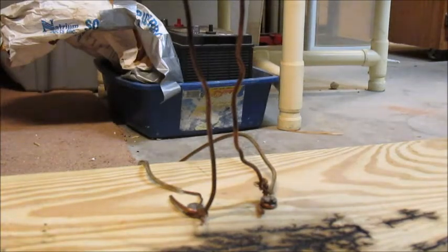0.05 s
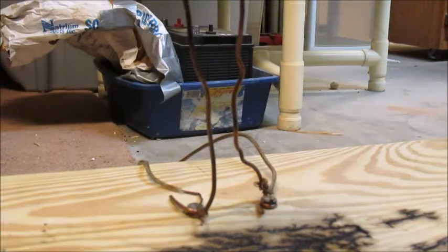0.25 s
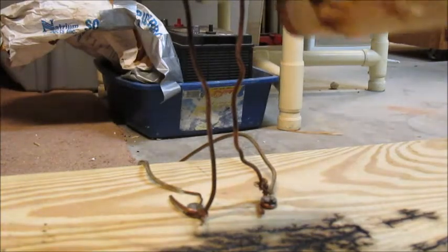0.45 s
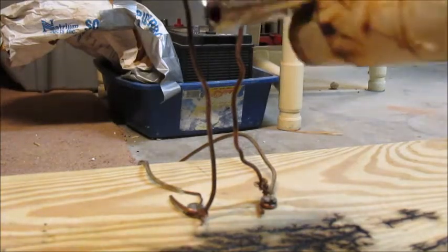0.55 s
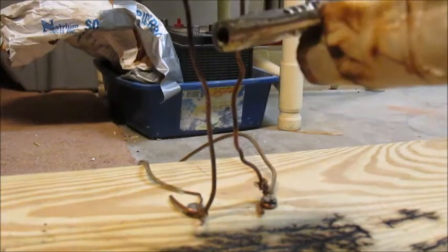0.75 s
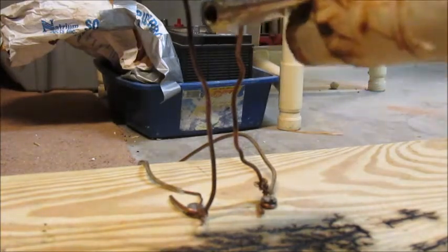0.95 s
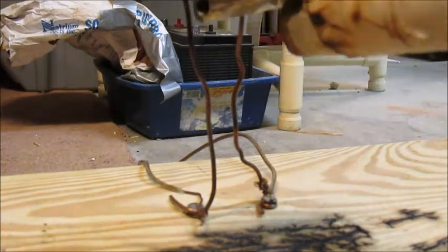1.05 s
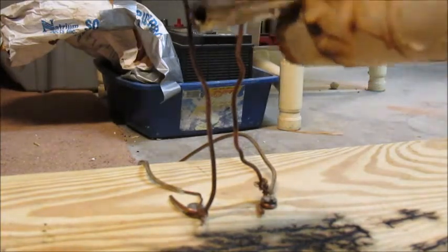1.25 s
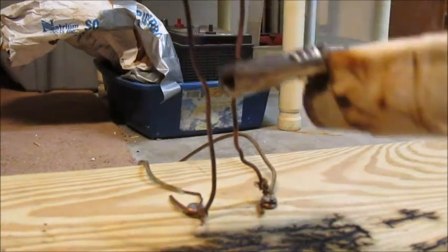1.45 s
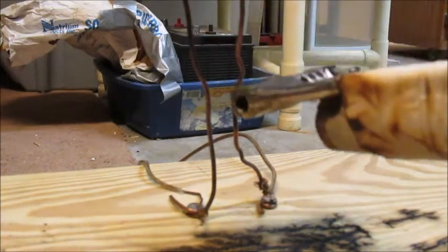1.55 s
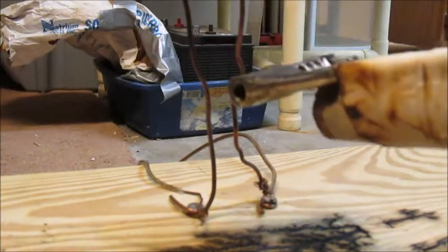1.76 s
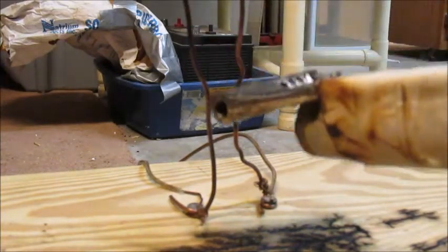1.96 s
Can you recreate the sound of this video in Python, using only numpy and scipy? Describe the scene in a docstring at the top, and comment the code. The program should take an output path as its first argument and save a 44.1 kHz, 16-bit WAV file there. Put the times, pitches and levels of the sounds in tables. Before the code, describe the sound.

An electric arc between two wires starts with a sharp crack, buzzes harshly and snaps off, then does it again. A thin sizzle precedes each burst, close to the microphone in a small room with a low hum.

```python
"""An arc climbing between two upright high-voltage wires on a workbench, close to a stereo microphone.
Corona sizzles in time with the mains until the gap breaks down with a crack. The arc then re-ignites on
every half cycle, stretches, deepens and snaps off; this happens twice. A few pops hit mainly the left
microphone. The room is small and hard, with a rush of air and the low hum of a fan or motor;
both dip with the recorder's gain after each loud arc."""
import sys
import numpy as np
from scipy import signal
from scipy.fft import rfft, irfft
from scipy.io import wavfile
from scipy.ndimage import uniform_filter1d

SR = 44100
rng = np.random.default_rng(int(sys.argv[2]) if len(sys.argv) > 2 else 0)


def waveform_to_disk(signal):
    """Save audio, clipped to [-1, 1], as 16-bit WAV at the path in sys.argv[1]."""
    frames = np.transpose(np.atleast_2d(signal))
    scaled = np.clip(frames, -1, 1) * 32767
    samples = np.round(scaled).astype(np.int16)
    wavfile.write(sys.argv[1], SR, samples)


N = 88200
MAINS_HZ = 60.0
HALF_CYCLE_S = .5 / MAINS_HZ
SPARK_SAMPLES = 512

# Breakdowns of the gap; stretch runs from a short arc (0) to a long one (1), pan is left over right
# [t/s, level/dB, sound travel along the channel/s, far end of the channel/dB, stretch, thud/dB, pan/dB]
BREAKDOWNS = [(0.2335, -16.5, 0.00061, -17.5, 0.23, -52.5, 3.5),
              (1.0698, -19.5, 0.0013, -7.5, 0.4, -45.5, 7)]
# Course of the arc up the wires, one list per climb [t/s, spark level/dB, stretch, thud/dB, pan/dB]
ARC_CLIMBS = [
    [(.243, -30, 0, -64.5, 3), (.29, -34.5, 0.17, -61.5, 0.5), (.33, -33, 0.22, -63, 2),
     (.434, -34, 0.15, -67, 4.5), (.452, -25, 0.05, -58, 1), (.478, -23.5, 0, -53.5, 3.5),
     (.54, -28.5, 0.2, -57.5, 2.5), (.585, -34, 0.94, -55, -1), (.602, -25.5, 0.58, -50, 0),
     (.622, -28.5, 0.67, -56, -0.5)],
    [(1.075, -42, 0, -80, -4.5), (1.10, -39, 0.3, -61.5, 3), (1.205, -41.5, 0.04, -73.5, -0.5),
     (1.28, -35, 0.42, -58.5, 1), (1.33, -33, 0.45, -61, -1), (1.382, -31.5, 0.69, -52, -0.5),
     (1.402, -29.5, 0.99, -54, -2.5), (1.413, -19, 0.8, -47, -2)],
]


def undb(db):
    return 10 ** (np.asarray(db) / 20)


def unit(x):
    return x / np.sqrt(np.mean(x ** 2))


def spectrum_db(points, size):
    """A curve [f/Hz, level/dB] on the bins of a transform."""
    hz, db = np.array(points, float).T
    return np.interp(np.log(np.fft.rfftfreq(size, 1 / SR) + 1), np.log(hz), db)


def colour(x, points):
    """Give a sound a spectrum."""
    return irfft(rfft(x) * undb(spectrum_db(points, N)), N)


def causal(db):
    """Response that starts at once and rings off, with the given gains."""
    cepstrum = irfft(db * np.log(10) / 20)
    cepstrum[1:len(cepstrum) // 2] *= 2
    cepstrum[len(cepstrum) // 2 + 1:] = 0
    return np.exp(rfft(cepstrum))


def wander(rate_hz):
    """Smooth random motion with a spread near 1."""
    hold = int(SR / rate_hz)
    steps = np.repeat(rng.standard_normal(N // hold + 1), hold)
    return unit(uniform_filter1d(uniform_filter1d(steps, hold), hold)[:N])


def add(out, t, sound, pan_db):
    """Mix a short sound in at its exact time and place."""
    start, fraction = divmod(max(t, 0) * SR, 1)
    start = int(start)
    shift = np.exp(-2j * np.pi * np.fft.rfftfreq(SPARK_SAMPLES) * fraction)
    sound = irfft(rfft(sound) * shift)[:, :N - start]
    out[:, start:start + SPARK_SAMPLES] += sound * undb(np.array([[pan_db], [-pan_db]]) / 2)


def corona(t):
    """Hiss flares on the wires at each voltage peak, more on one polarity; at first with a tick a cycle."""
    # Loudness of the corona [t/s, level/dB]
    levels = [(0, -54), (.15, -56), (.22, -56.5), (.72, -62.5), (.95, -59.5), (1.06, -57), (1.55, -63.5),
              (2, -63)]
    # Spectrum of its hiss [f/Hz, level/dB]
    spectrum = [(1470, -63.5), (2500, -30.5), (3600, -19.5), (5270, -13.5), (6920, -11), (9730, -3.5),
                (11500, -2), (15200, -6), (16000, -20.5)]
    peak_s, width_s, weak_half_db = .0115, .003, -5.5
    ticks_until_s, tick_lead_s = .15, .0015

    def flare(at):
        away = (t - at + HALF_CYCLE_S) % (1 / MAINS_HZ) - HALF_CYCLE_S
        return np.exp(-np.abs(away / width_s) ** 3)
    flares = flare(peak_s) + undb(weak_half_db) * flare(peak_s + HALF_CYCLE_S)
    noise = rng.standard_normal(N) + .98 * rng.standard_normal((2, N))
    flicker = np.exp(.29 * wander(1500))
    hiss = unit(colour(noise, [(600, -36.5)] + list(spectrum)) * flares * flicker)
    out = hiss * undb(np.interp(t, *np.array(levels).T))
    for strike, climb in zip(BREAKDOWNS, ARC_CLIMBS):
        out *= (t < strike[0]) | (t > climb[-1][0])  # it dies while an arc shorts the wires
    for peak in np.arange(peak_s, ticks_until_s, 1 / MAINS_HZ):
        at = peak - tick_lead_s * rng.random()
        tick = spark(np.zeros(1), np.ones(1), stretch=.17, db=-54 + 2 * rng.standard_normal())
        add(out, at, tick, pan_db=2)
    return out


def room_tone(t):
    """Wavering low hum of a fan or motor, with faint mains tones above it, over the rush of the room."""
    # Tones of the hum [f/Hz, level/dB before the recorder's gain, unsteadiness]
    hum = [(52.7, -71, 0.37), (116.3, -80.5, 0.72), (358, -85, .45), (600, -93.5, 0.27), (670, -97, .5)]
    # Spectrum of the rush [f/Hz, level/dB]
    rush = [(15, -54), (25, -1.5), (59, -4.5), (82, -9), (117, -3.5), (189, -10), (359, -18.5),
            (389, -17.5), (3000, -32), (3900, -52), (6600, -120)]
    # The recorder's gain on hum and rush dips after each loud arc and slowly recovers [t/s, level/dB]
    recorder_gain = [(0, 7), (.2, 7.5), (.68, 1), (1.0, 5), (1.5, 0), (2, 2)]
    air = rng.standard_normal(N) + rng.standard_normal(N) * np.array([[1], [-1]])
    out = undb(-70) * unit(colour(air, list(rush) + [(8000, -30.5)]))
    for hz, db, waver in hum:
        for side in out:
            amplitude = undb(db) * np.sqrt(2) * (1 + waver * wander(11))
            side += amplitude * np.sin(2 * np.pi * hz * t + waver * wander(3.3))
    return out * undb(np.interp(t, *np.array(recorder_gain).T))


def spark(delays, sizes, stretch, db):
    """Each bend of the channel sends a tiny shock to each microphone, deeper in a long arc."""
    # Spectrum of a spark in a short arc [f/Hz, level/dB]
    short_arc = [(300, -50), (1000, -33), (2000, -33.5), (3500, -24.5), (5000, -26.5), (7500, -18.5),
                 (9500, -9), (12300, 2), (14500, -2), (16500, -16.5)]
    # The same in a long arc [f/Hz, level/dB]
    long_arc = [(300, -53), (1000, -22.5), (2100, -24), (2700, -12.5), (3600, -5.5), (4900, -8.5),
                (6400, -4.5), (7600, -5), (9200, 0.5), (12000, -5.5), (16500, -19.5)]
    mic_lag_s, mic_imbalance = .000005, .22
    hz = np.fft.rfftfreq(SPARK_SAMPLES, 1 / SR)
    stretch = np.clip(stretch, 0, 1)
    shock = causal((1 - stretch) * spectrum_db(short_arc, SPARK_SAMPLES)
                   + stretch * spectrum_db(long_arc, SPARK_SAMPLES))
    lag, lean = rng.standard_normal((2, 1, len(delays))) * np.array([[1], [-1]])
    delays = delays + mic_lag_s * lag
    delays = delays - delays.min() + 4 / SR
    sizes = sizes * np.exp(mic_imbalance * lean)
    bends = sizes[..., None] * np.exp(-2j * np.pi * delays[..., None] * hz)
    return -undb(db) * unit(irfft(shock * bends.sum(axis=1)))


def thud(db, corner_hz=426):
    """The suddenly heated air gives one soft, low push."""
    age = 2 * np.pi * corner_hz * np.arange(SPARK_SAMPLES) / SR
    return -undb(db) * unit(np.exp(-age) * (1 - np.exp(-4 * age)))


def fresh_channel(bends=7):
    """Places (0-1) of the bends along a new channel."""
    place = (np.arange(bends) + rng.random(bends)) / bends
    return place - place[0]


def breakdowns():
    """The air in the gap gives way with one crack and a thud."""
    out = np.zeros((2, N))
    for at, db, path_s, far_db, stretch, thud_db, pan_db in BREAKDOWNS:
        place = fresh_channel()
        crack = spark(place * path_s, undb(far_db * place), stretch, db)
        add(out, at, crack + thud(thud_db), pan_db)
    return out


def climbing_arcs():
    """A spark each half cycle through a writhing channel, with small side discharges between."""
    ignition_s, jitter_s = .0021, .00008  # place of a spark in the half cycle, its scatter
    path_s, writhe_s, shake_s = .0008, .00002, .000006  # delays of the bends: span, drift, scatter
    far_end_db = [-3, -17.5]  # against the near end, in a short and a long arc
    spark_scatter_db, thud_scatter_db = 1.27, 2
    strays, stray_db, stray_scatter_db = 2, -18, 4.5
    out = np.zeros((2, N))
    ignitions = np.arange(ignition_s, N / SR, HALF_CYCLE_S)
    for climb in ARC_CLIMBS:
        times, *controls = np.array(climb).T
        place = fresh_channel()
        delays = place * path_s
        for at in ignitions[(ignitions >= times[0]) & (ignitions <= times[-1])]:
            db, stretch, thud_db, pan_db = (np.interp(at, times, column) for column in controls)
            drift, shake, flash = rng.standard_normal((3, len(place)))
            loud, push, late = rng.standard_normal(3)
            delays = delays + writhe_s * drift
            sizes = undb(place * np.interp(stretch, [0, 1], far_end_db)) * np.exp(.34 * flash)
            crack = spark(delays + shake_s * shake, sizes, stretch, db + spark_scatter_db * loud)
            crack += thud(thud_db + thud_scatter_db * push)
            add(out, at - path_s / 2 + jitter_s * late, crack, pan_db)
            for early in rng.random(strays):
                sizes = rng.standard_normal(len(place))
                level_db = db + stray_db + stray_scatter_db * rng.standard_normal()
                add(out, at - early * HALF_CYCLE_S, spark(delays, sizes, stretch, level_db), pan_db)
    return out


def sizzle(t):
    """The burning channel fries between the sparks, louder as they grow."""
    # Spectrum of the frying [f/Hz, level/dB]
    spectrum = [(200, -15.5), (700, -13.5), (2000, -16), (3400, -6.5), (4800, -10.5), (6500, -6.5),
                (9000, -1.5), (12000, 0.5), (16000, -8.5)]
    base_db, follow = -32, .46  # level with sparks at 0 dB, dB per spark dB
    gain = 0
    for climb in ARC_CLIMBS:
        times, spark_db = np.array(climb).T[:2]
        burning = (t > times[0]) & (t < times[-1])
        gain = gain + undb(base_db + follow * np.interp(t, times, spark_db)) * burning
    noise = rng.standard_normal(N) + .63 * rng.standard_normal((2, N))
    grain = np.exp(.55 * wander(2500))
    return gain * unit(colour(noise * grain, spectrum))


def pops(t):
    """Some sparks jolt the left microphone: a ragged, one-sided bump that swings back."""
    # Electrical pickup [t/s, level/dB]
    jolts = [(.2762, -31), (0.3759, -26), (0.3839, -25), (0.3926, -32.5), (1.0695, -22.5), (1.1178, -38.5),
             (1.1347, -31), (1.2508, -23)]
    rise_s, raggedness = .0007, .28
    bumps = 0
    for at, db in jolts:
        age = np.maximum(t - at, 0) / rise_s
        bumps = bumps + undb(db) * age * np.exp(1 - age)
    edge_band = signal.butter(3, [870, 1740], "band", fs=SR, output="sos")
    edge = unit(signal.sosfilt(edge_band, rng.standard_normal(N)))
    low_cut = signal.butter(2, 60, "high", fs=SR, output="sos")
    left = signal.sosfilt(low_cut, bumps * (1 + raggedness * edge))
    right = -.38 * signal.sosfilt(signal.butter(1, 300, fs=SR, output="sos"), left)  # dull, inverted
    return np.array([left, right])


def whistles(t):
    """A faint, wavering tone passes during each climb."""
    # Brief whistles [t/s, half-width/s, f/Hz, level/dB]
    tones = [(0.421, 0.0094, 1888, -49.5), (1.183, 0.019, 480, -62)]
    out = np.zeros(N)
    for at, width_s, hz, db in tones:
        envelope = undb(db) * np.exp(-((t - at) / width_s) ** 2)
        out += envelope * np.sin(2 * np.pi * hz * t + .45 * wander(250))
    return out


def room(direct, t):
    """Quick reflections from the bench and clutter, then the tail of the walls."""
    # Spectrum of the reflections [f/Hz, level/dB]
    spectrum = [(100, -0.5), (1000, 1.5), (2000, 4.5), (3700, -1.5), (6000, 1), (9000, -3), (12500, -6),
                (16000, -13)]
    first_echo_s = .0012

    def echoes(t60_s, db):
        noise = colour(rng.standard_normal((2, N)), spectrum)
        tail = noise * undb(-60 * t / t60_s) * (t > first_echo_s)
        return undb(db) * unit(tail) / np.sqrt(N)
    response = echoes(t60_s=.078, db=-13.5) + echoes(t60_s=.28, db=-17)
    return direct + signal.fftconvolve(direct.mean(axis=0)[None], response, axes=1)[:, :N]


def scene():
    """The close sounds of the bench ring in the room; pops and room tone stay dry."""
    t = np.arange(N) / SR
    bench = breakdowns() + climbing_arcs() + sizzle(t) + corona(t) + whistles(t)
    return room(bench, t) + pops(t) + room_tone(t)


def record(dry):
    """The recorder drops the deepest bass, clips at full scale and cuts the top."""
    low_cut = signal.butter(1, 20, "high", fs=SR, output="sos")
    top_cut = signal.ellip(8, .2, 70, 16200, fs=SR, output="sos")
    return signal.sosfilt(top_cut, np.clip(signal.sosfilt(low_cut, dry), -1, 1))


dry = scene()
out = record(dry)
waveform_to_disk(out)
```